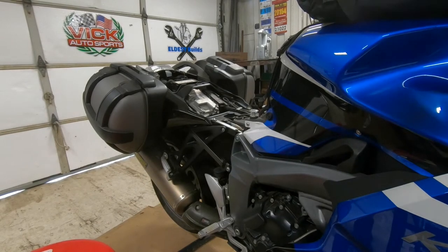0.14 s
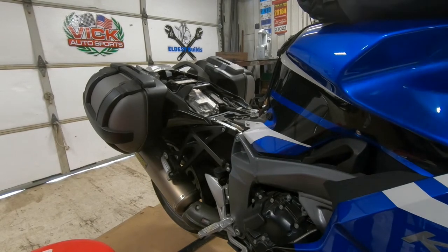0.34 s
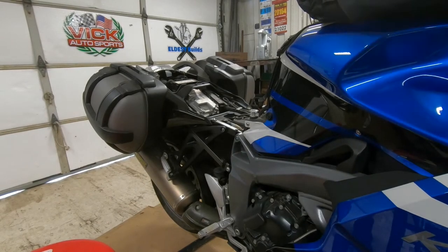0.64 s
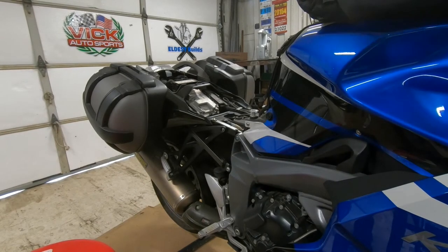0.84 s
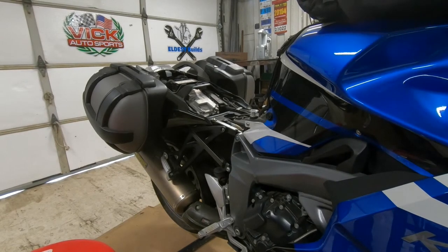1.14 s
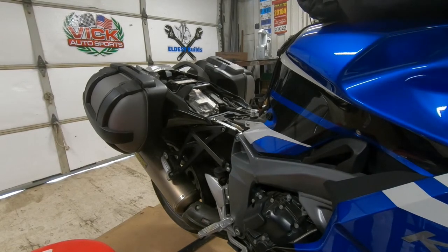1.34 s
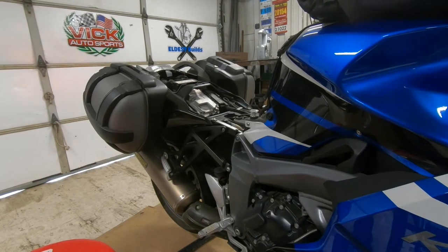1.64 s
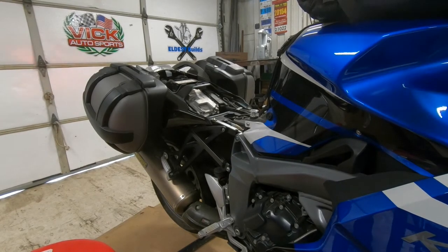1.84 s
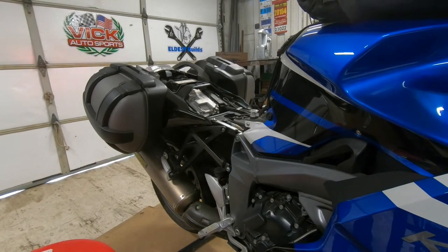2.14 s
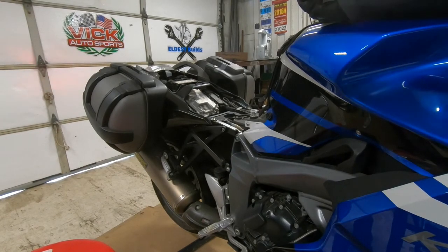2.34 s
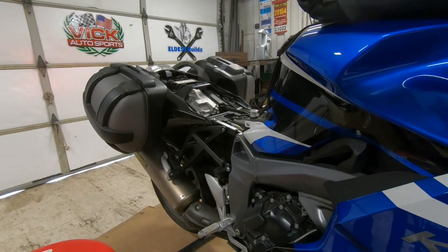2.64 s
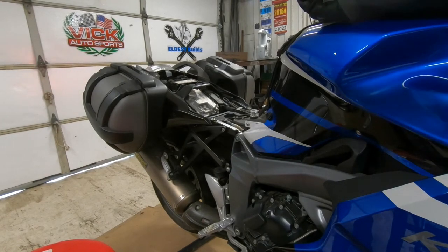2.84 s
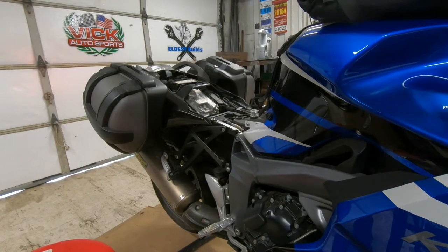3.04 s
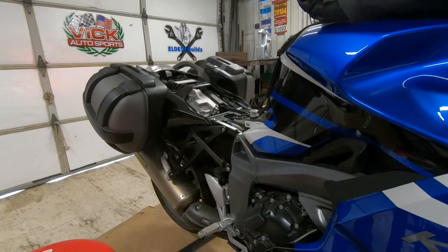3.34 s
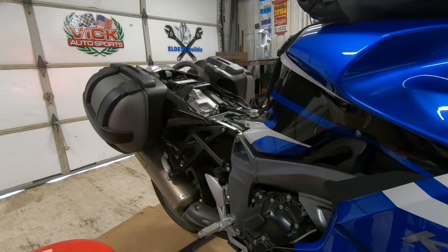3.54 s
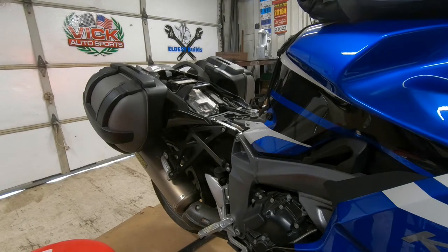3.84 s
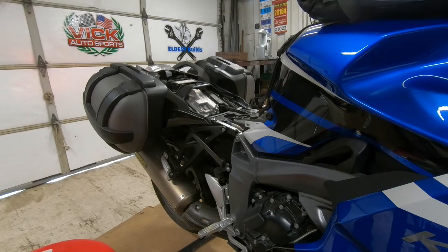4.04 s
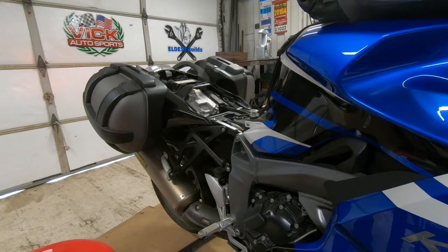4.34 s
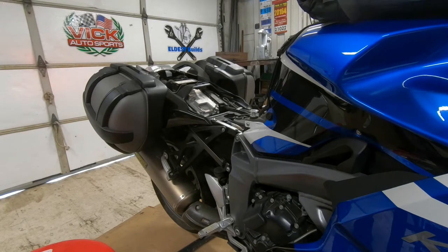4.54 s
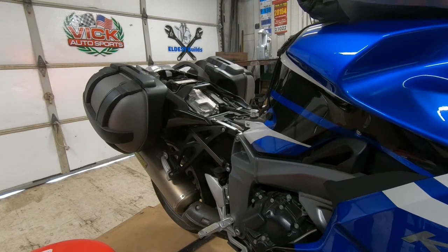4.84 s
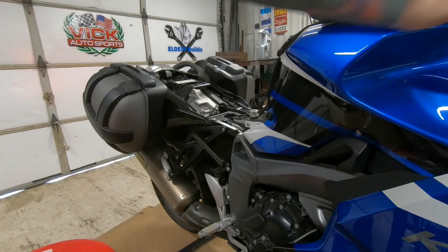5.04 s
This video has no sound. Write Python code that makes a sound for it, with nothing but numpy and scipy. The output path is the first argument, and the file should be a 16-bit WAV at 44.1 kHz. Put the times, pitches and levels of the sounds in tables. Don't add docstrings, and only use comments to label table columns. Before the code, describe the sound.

Handheld recorder near the bike, essentially centred sound with a short hard-room tail. Quiet droning hum first, then metallic lock clicks, a soft sleeve rub and two brief servo whirs ending in plastic knocks. A sharp clunk starts the whining, lurching starter with low puffs from the exhaust; the multi-cylinder engine bursts into life and drops to a steady throaty idle.

```python
import sys
import numpy as np
from scipy import signal
from scipy.fft import rfft, irfft
from scipy.io import wavfile
from scipy.ndimage import uniform_filter1d

SR = 44100
rng = np.random.default_rng(int(sys.argv[2]) if len(sys.argv) > 2 else 0)


def field_ratio(decibels):
    return 10 ** (np.asarray(decibels, dtype=float) / 20)


def bounce(signal):
    frames = np.transpose(np.atleast_2d(signal))
    limited = np.clip(frames, -1, 1)
    pcm = np.round(limited * 32767).astype(np.int16)
    wavfile.write(sys.argv[1], SR, pcm)


N = 228471


def columns(rows, off=None):
    s, *rest = np.transpose(rows)
    return [np.interp(np.arange(N) / SR, s, c, off, off) for c in rest]


def rms_one(x):
    return x / np.sqrt(np.mean(x ** 2) + 1e-20)


def coloured(spectrum):
    hz, db = np.transpose(spectrum)
    bins = np.maximum(np.arange(N // 2 + 1) * SR / N, 1)
    gain = field_ratio(np.interp(np.log(bins), np.log(hz), db, -90, -90))
    return rms_one(irfft(rfft(rng.standard_normal(N)) * gain, N))


def drift(hz):
    r = np.exp(-2 * np.pi * hz / SR)
    return rms_one(signal.lfilter([1], [1, -2 * r, r * r], rng.standard_normal(N + SR))[SR:])


def resonate(x, modes):
    out = 0
    for k, (hz, width, db) in enumerate(modes):
        r = np.exp(-np.pi * width / SR)
        top = np.array([1, 0, -1]) * (1 - r * r) / 2
        bottom = [1, -2 * r * np.cos(2 * np.pi * hz / SR), r * r]
        out = out + (-1) ** k * field_ratio(db) * signal.lfilter(top, bottom, x + 1e-18)
    return out


def cut(x, hz, kind, order=4):
    return signal.sosfilt(signal.butter(order, hz, kind, fs=SR, output="sos"), x)


def pulses(per_s):
    return np.flatnonzero(np.diff(np.floor(np.cumsum(per_s) / SR))) + 1


def bumps(rows, width, rest_db):
    t = np.arange(N) / SR
    return field_ratio(rest_db) + sum(field_ratio(db) * np.exp(-((t - s) / width) ** 2) for s, db in rows)


def background():
    # hz, level_db (rms)
    hum_lines = [(58.03, -46), (116.1, -57.5), (120.0, -81), (174.1, -53), (178.1, -130), (232.2, -68.5),
                 (236.1, -63), (240.1, -82), (290.2, -63.5), (294.0, -100), (1000, -68)]
    # time_s, level_db
    overtones = [(0, -3), (2.7, -2.5), (3.1, -3.5), (3.5, -4.5)]
    # hz, level_db (per Hz)
    floor = [(190, -22), (320, -20), (347, -2.5), (489, -4), (585, -4.5), (1070, -7.5), (1530, -14),
             (1660, -14.5), (2840, -18), (15700, -38)]
    drone = [(15, 15), (30, -15.5), (60, 2.5), (90, -13), (160, -9.5), (250, -11.5), (330, -15.5)]
    # time_s, level_db
    sways = [(0.05, -37), (0.55, -44.5), (1.05, -40), (1.31, -37), (1.67, -36.5), (1.95, -45.5),
             (2.31, -39), (2.71, -34.5), (3.13, -48), (3.55, -48)]
    # time_s, level_db
    jogs = [(0.0, -58), (0.33, -65), (1.05, -53), (1.67, -46), (2.08, -62), (2.55, -62), (2.8, -60),
            (3.54, -47)]
    t = np.arange(N) / SR
    fade_db, waver = columns(overtones)[0], drift(3.7)
    hum = 0
    for k, (hz, db) in enumerate(hum_lines):
        line_db = db + 3.0 + 0.24 * waver + (k > 0) * fade_db
        hum = hum + field_ratio(line_db) * np.sin(2 * np.pi * hz * t + k * k)
    swing = np.sin(2 * np.pi * np.cumsum(7.4 + 1.0 * drift(1.27)) / SR)
    sway = field_ratio(2.0) * bumps(sways, 0.12, rest_db=-48.5) * swing
    jog = bumps(jogs, 0.043, rest_db=-66) * coloured([(14, 13), (28, 4), (45, 13), (70, -52)])
    sleeve_on_s, sleeve_off_s = 1.5, 1.93
    rise_db_per_s, fall_db_per_s = 90, 78
    rub_db = -55 - rise_db_per_s * np.maximum(sleeve_on_s - t, 0) - fall_db_per_s * np.maximum(t - sleeve_off_s, 0)
    flutter_db = 0.7 * drift(7.2) + 2.0 * drift(44)
    sleeve = field_ratio(rub_db + flutter_db) * coloured([(300, 4), (700, 5), (1500, -1), (2500, -29)])
    faint_hiss = field_ratio(-83) * coloured([(4400, -19.5), (4650, 1), (4900, -22)])
    return hum + sway + jog + sleeve + field_ratio(-59) * coloured(floor) + field_ratio(-52.5) * coloured(drone) + faint_hiss


def clicks():
    # time_s, peak_db, ring_hz, ring_db, treble_db
    contacts = [(1.089, -41.5, 1890, -7, -20), (1.112, -40, 1610, -12, -4), (1.123, -27, 4000, 6.5, 3.5),
                (1.129, -32, 1800, 11.5, -12), (1.132, -36, 520, 14, -8), (1.17, -23, 2960, -16, 2),
                (1.197, -34, 4180, -10, -18), (1.428, -49, 1260, -4, -14), (1.728, -32.5, 4270, 1.5, -29),
                (1.895, -28.5, 1510, 4, -23), (1.937, -32, 2900, -1, -8), (2.348, -28.5, 2170, -15, -8.5),
                (2.696, -34, 1740, 11.5, -38), (3.38, -38, 1580, 13, -40), (3.487, -19, 2190, 1.5, -41)]
    # hz, level_db, t60_s
    barrel = [(2266, -24, 0.16), (3980, 8.5, 0.028), (4177, -20, 5.0), (4960, -10, 0.041),
              (6700, -14, 0.12), (8091, -19, 0.21), (8900, 1.5, 0.018)]
    # time_s, level_db
    stops = [
        (1.893, -20.5),
        (1.938, -25),
        (2.35, -22.5),
        (2.697, -12.5),
    ]
    # hz, level_db, t60_s
    panel = [(840, 3, 0.6), (1194, -2.5, 0.075), (1784, 3.5, 0.12), (2160, 3.5, 0.14), (3070, -14, .08),
             (4240, 0.5, 0.087), (8300, -12, 0.097)]
    out, taps, turns = np.zeros((3, N))
    t = np.arange(SR // 8) / SR
    for s, db, hz, ring_db, treble_db in contacts:
        noise = rng.standard_normal((2, len(t)))
        rattle = noise * (1 - np.exp(-t / 0.0013)) * np.exp(-t / 0.0049) * field_ratio(db - 6.0)
        crack = 2 * cut(rattle[0], [max(0.45 * hz, 900), 5200], "band")
        fizz = 1.5 * field_ratio(treble_db) * cut(rattle[1], [7800, 13000], "band", order=2)
        knock = field_ratio(2) * cut(rattle[1], [350, 900], "band", order=2)
        ring = resonate(rattle[0], [(hz, 0.15 * hz, ring_db + 13)])
        start = round(s * SR)
        turns[start:][:len(t)] += rattle[0] * field_ratio(treble_db)
        out[start:][:len(t)] += crack + fizz + knock + ring
    for s, db in stops:
        taps[round(s * SR)] = field_ratio(db)
    lock = resonate(turns, [(hz, 7.0 / min(t60, 0.025), db + 8) for hz, db, t60 in barrel])
    return out + lock + resonate(taps, [(hz, 3.3 / t60, db + 20.5) for hz, db, t60 in panel])


def servo():
    # start_s, stop_s, level_db, dying_db_per_s
    runs = [
        (1.727, 1.896, -51, 213),
        (2.346, 2.696, -52, 450),
    ]
    # hz, width_hz, level_db
    housing = [(1000, 110, 2), (2520, 210, -1.5), (3840, 97, -1), (4520, 220, 0), (6200, 200, -8.5),
               (6600, 88, -10), (7630, 46, -5), (7530, 69, -19), (8100, 66, -7), (8140, 37, -17),
               (9900, 200, -23), (13400, 140, -16)]
    # hz, level_db (per Hz)
    gear_noise = [(530, -28), (900, -19), (1200, -1.5), (2570, 0.5), (3380, -3), (4490, -17), (5500, -19),
                  (7590, -3), (15500, -25)]
    t, level = np.arange(N) / SR, 0
    jerk_db, jerk_s, sag_db_per_s, jam_db = 1.5, 0.011, 8, 10.5
    for on, off, db, dying in runs:
        running_db = jerk_db * np.exp(-np.abs(t - on) / jerk_s) - sag_db_per_s * (t - on)
        running = (t > on) * (t < off) * field_ratio(running_db)
        jammed = (t >= off) * field_ratio(jam_db - dying * np.abs(t - off))
        level = level + field_ratio(db) * (running + jammed)
    beat_hz, depth = columns([(2.4, 76, .4), (2.55, 62, .6), (2.69, 48, 1.3), (2.692, 48, 0)])
    buzz = field_ratio(5.5 * depth * np.sin(2 * np.pi * np.cumsum(beat_hz) / SR))
    body = rms_one(resonate(rng.standard_normal(N), housing))
    return level * rms_one(0.9 * buzz * body + buzz ** 0.7 * coloured(gear_noise))


def starter():
    # start_s, peak_db, mesh_start_hz, mesh_end_hz, length_s
    strokes = [
        (3.536, -27.5, 714.7, 655.8, .055),
        (3.625, -20.5, 1095, 648, 0.096),
        (3.793, -17, 834, 715, 0.05),
        (3.909, -18, 1123, 598.8, 0.051),
        (4.02, -19, 1157, 599.3, .055),
        (4.134, -19.5, 1208, 608, 0.062),
        (4.229, -22, 1148, 816, .08),
    ]
    # time_s, level_db
    puffs = [
        (3.521, -39),
        (3.674, -29.5),
        (3.791, -33),
        (3.905, -31.5),
        (4.02, -27.5),
        (4.135, -25),
    ]
    # hz, width_hz, level_db
    crankcase = [(646, 20, 2), (842, 32, 5), (1171, 96, 2.5), (1560, 120, 3.5), (2010, 30, 8),
                 (2270, 41, 4), (2755, 86, 2), (3125, 106, -0.5), (3590, 130, -1.5), (3960, 108, -3),
                 (4670, 150, -14), (6630, 126, -13.5), (7750, 29, -37), (9350, 44, -19)]
    # hz, level_db (per Hz)
    grind_noise = [(88, -4.5), (150, -10.5), (530, -10.5), (751, -11.5), (827, -12), (1240, -6.5),
                   (1540, -9), (2270, -5.5), (3910, -13), (5440, -21.5), (6730, -28), (15500, -58.5)]
    brush_noise = [(4800, -16), (6000, -18), (6700, 11), (7400, 3.5), (11000, -5.5), (15700, -22)]
    on_s, off_s, free_db = 3.484, 4.33, -31.5
    judder_hz, judder = 45.5, 0.24
    sag_rate = 2.2
    steady_hz, looseness = 740, 0.2
    t = np.arange(N) / SR
    load, mesh, thump = np.zeros(N), np.full(N, 1000.), np.zeros(N)
    for s, db, from_hz, to_hz, length in strokes:
        part = np.maximum(t - s, 0) / length
        effort = (1 - np.exp(-part * 7)) * np.exp(-part ** 2.9 * 1.5)
        load += field_ratio(db) * effort * (1 - judder * np.sin(2 * np.pi * judder_hz * (t - s) + 2.0))
        mesh = np.where(t > s, to_hz + (from_hz - to_hz) * np.exp(-sag_rate * part ** 1.4), mesh)
    for s, thump_db in puffs:
        age = np.maximum(t - s, 0)
        puff = np.sin(2 * np.pi * 56 * age) + 0.48 * np.sin(2 * np.pi * 108 * age) * age / 0.043
        thump += field_ratio(thump_db) * age * 130 * np.exp(-age * 45) * puff

    teeth, at = np.zeros(N), pulses(mesh * (1 + 0.004 * drift(150)))
    play = looseness * np.clip(mesh[at] / steady_hz - 1, 0, 0.5)
    early = play * SR / mesh[at] * rng.standard_normal(N)[at]
    at = np.clip(at + early.astype(int), 0, N - 1)
    teeth[at] = field_ratio(1.0 * rng.standard_normal(N)[at])
    whine = rms_one(cut(resonate(teeth, [(hz, w * 3.4, db) for hz, w, db in crankcase]), 530, "high"))
    grind = coloured(grind_noise)
    ringing = rms_one(resonate(rng.standard_normal(N) * load, crankcase)) / rms_one(load).max()

    running = np.clip((t - on_s) / 0.0011, 0, 1) * np.clip((off_s - t) / 0.024, 0, 1)
    clunk_decay = (t > on_s) * np.exp(-np.maximum(t - on_s, 0) / 0.029)
    clunk = field_ratio(-28.5) * clunk_decay * coloured([(250, -19), (400, -1), (650, 4), (1000, -10)])
    brushes = field_ratio(-49 + 2 * drift(28)) * running * (1 + 8 * load) * coloured(brush_noise)
    lumpy = field_ratio(1.8 * drift(45))
    strained = whine + 0.22 * cut(grind, 5000, "low", order=1)
    free = field_ratio(free_db) * running * (grind + 0.14 * whine)
    return load * lumpy * strained + 0.13 * ringing + free + thump + clunk + brushes


def engine():
    # time_s, firings_per_s
    speed = [(4.215, 52), (4.3, 57), (4.35, 59.2), (4.41, 58.5), (4.47, 48.4), (4.65, 48.2), (4.72, 50.3),
             (4.95, 50.1), (5.06, 48), (5.18, 49.7)]
    # time_s, level_db
    combustion = [(4.215, -14), (4.26, -10), (4.322, -23.5), (4.337, -15.5), (4.4, -16), (4.607, -25),
                  (4.819, -18.5), (5.0, -15), (5.18, -15)]
    cylinders = [-4.2, -3.5, -5, -3]
    # time_s, level_db
    first_bangs = [
        (4.223, 4.5),
        (4.246, 0),
        (4.256, -4.5),
        (4.266, -3),
        (4.281, -2.5),
        (4.298, 0),
        (4.31, -9),
        (4.341, 0.5),
    ]
    # hz, width_hz, level_db
    silencer = [(56, 19.4, 4.5), (108.3, 42, 7.5)]
    pipe = [(202.4, 26.4, 0.5), (254.6, 21, 1.5), (287, 43, -9.5), (356, 9.2, 4), (386.8, 12, -1.5),
            (438.3, 22, -2.5), (513, 79, -23)]
    cover_modes = [(1438, 28, 15.5), (1960, 63, -8), (2720, 44, -16), (2820, 170, -0.5), (3640, 64, 4.5),
                   (3727, 65, 4), (4160, 85, -1), (5880, 297, -10)]
    # hz, level_db (per Hz)
    valve_noise = [(310, -37), (520, -4), (722, -7), (832, -4.5), (1280, -3), (1450, 2.5), (1900, -1),
                   (3990, -6.5), (4350, -9), (4740, -10), (6390, -18.5), (11800, -23.5), (15700, -40)]
    t = np.arange(N) / SR
    (per_s,), (boom_db,) = columns(speed), columns(combustion)
    catch_s = combustion[0][0]
    rich = np.clip(1 - (t - 4.3) / 0.05, 0, 1)
    uneven_catch, uneven_idle = 0.5, 0.08
    uneven = uneven_idle + (uneven_catch - uneven_idle) * rich
    bark_db = -8.5 + 0.7 * boom_db + 2.5 * rich + 0.27 * (per_s - per_s[-1])
    clatter_db = -22 + 0.25 * boom_db + 7 * np.exp(-np.abs(t - catch_s) / 0.052)
    on = np.clip((t - catch_s) / 0.002, 0, 1)

    at = pulses(per_s * (on > 0))
    chance = rng.standard_normal((len(at), 2)) * np.clip(uneven[at], 0, 1)[:, None]
    gas, bangs = np.zeros(N), np.zeros(N)
    fired = np.clip(at + (chance[:, 0] * 0.003 * SR).astype(int), 0, N - 1)
    gas[fired] = field_ratio(np.resize(cylinders, len(at)) + 12.0 * chance[:, 1])
    for s, db in first_bangs:
        bangs[round(s * SR)] = field_ratio(db + 34.5)
    gas += 0.025 * uneven * on * rng.standard_normal(N)

    steady = slice(-SR // 3, None)
    boom = cut(resonate(gas, silencer), 154.4, "low")
    bark = cut(cut(resonate(gas, pipe), 453, "low", order=8), 98, "high")
    exhaust = field_ratio(boom_db) * boom / boom[steady].std() + field_ratio(bark_db) * bark / bark[steady].std()
    bang_modes = [(36, 36, 3), (70, 91, 8), (100, 40, 12.5), (227, 42, 4.5), (330, 145, -3), (464, 88, -4.5)]
    early = cut(resonate(bangs, bang_modes), 680, "low")

    valves = 1 + 0.035 * np.cos(4 * np.pi * np.cumsum(per_s) / SR)
    covers = rms_one(resonate(rng.standard_normal(N), cover_modes))
    clatter = field_ratio(clatter_db + 0.83 * drift(34)) * valves * rms_one(coloured(valve_noise) + 0.36 * covers)
    whine_hz = 88.2 * per_s
    whine_db = -35.5 - 200 * np.maximum(4.47 - t, 0) + 3 * drift(30)
    whine = field_ratio(whine_db) * np.sin(2 * np.pi * np.cumsum(whine_hz + 34 * drift(60)) / SR)
    return uniform_filter1d(on, size=1200) * clatter - on * exhaust + early + whine


def garage(x):
    t60_s = 0.35
    t = np.arange(SR // 2) / SR
    tail = rng.standard_normal(len(t)) * field_ratio(-60 * t / t60_s) * (t > 0.006)
    tail = cut(tail, [500, 7000], "band", order=1)
    return signal.fftconvolve(x, tail / np.sqrt(np.sum(tail ** 2)))[:N]


def flip_treble(mid):
    # start_s, end_s, share of treble bands
    patches = [
        (1.74, 1.95, 0.41),
        (3.48, 4.5, 0.33),
        (4.5, 5.1, 0.42),
    ]
    frame, grid = 1024, 494
    n, k = np.arange(2 * frame), np.arange(frame)
    window = signal.windows.kaiser_bessel_derived(2 * frame, 4 * np.pi)
    basis = np.cos(np.pi / frame * np.outer(n + 0.5 + frame / 2, k + 0.5)) * window[:, None]
    lead = 2 * frame - grid
    count = (N + lead) // frame + 1
    padded = np.pad(mid, (lead, (count + 1) * frame - N - lead))
    frames = np.lib.stride_tricks.sliding_window_view(padded, 2 * frame)[::frame].copy()
    lines = frames @ basis * 2 / frame

    chance = uniform_filter1d(rng.standard_normal((count, 32)), size=2, axis=0)
    chance = chance + rng.standard_normal((count, 1)) * 0.38
    rank = chance.ravel().argsort().argsort().reshape(chance.shape) / chance.size
    rank = rank[:, k // 32]
    s = (np.arange(count)[:, None] * frame - lead + frame) / SR
    share = sum(part * (s > start) * (s <= end) for start, end, part in patches)
    hz = k * SR / 2 / frame
    flipped = (rank < share) & (hz > 7900)
    leaking = (rank > 0.55) & (hz > 2500) & (hz < 8200)
    leak = field_ratio(-34.5) * hz / 4000 * leaking * rng.choice([-1, 1], lines.shape)

    parts = np.array([flipped * lines, leak * lines]) @ basis.T
    first_halves = np.pad(parts[..., :frame], ((0, 0), (0, 1), (0, 0)))
    second_halves = np.pad(parts[..., frame:], ((0, 0), (1, 0), (0, 0)))
    moved, leaked = (first_halves + second_halves).reshape(2, -1)[:, lead:lead + N]
    return np.array([mid + leaked, mid - 2 * moved - leaked])


def scene():
    # hz, width_hz, level_db
    standing_waves = [(117.2, 2.3, -0.5), (148.8, 2.2, 5), (294, 1.24, 10.5)]
    ambience = background()
    bike = clicks() + servo() + starter() + engine()
    mid = bike + field_ratio(-13) * garage(bike) + resonate(bike, standing_waves) + ambience
    return np.array([mid, mid])


def band_limit(x):
    return signal.sosfilt(signal.butter(12, 15830, fs=SR, output="sos"), x)


def record(dry):
    limited = 0.95 * np.tanh(dry[0] / 0.95)
    top_cut = cut(limited, 15700, "low", order=16)
    return band_limit(flip_treble(top_cut))


dry = scene()
out = record(dry)
bounce(out)
```